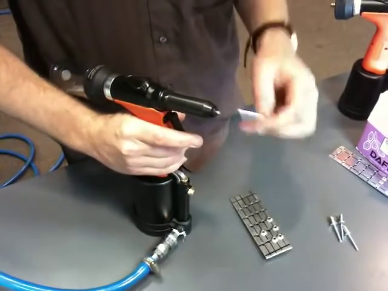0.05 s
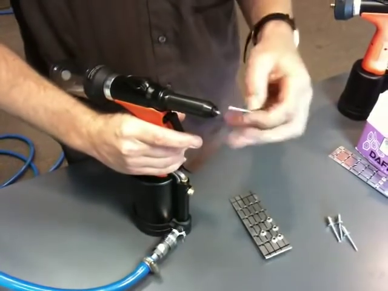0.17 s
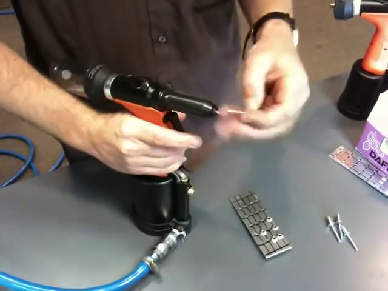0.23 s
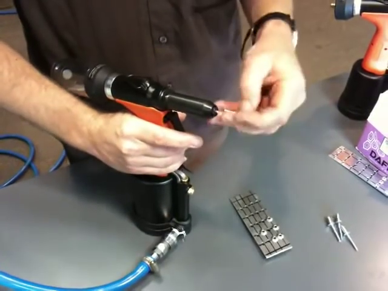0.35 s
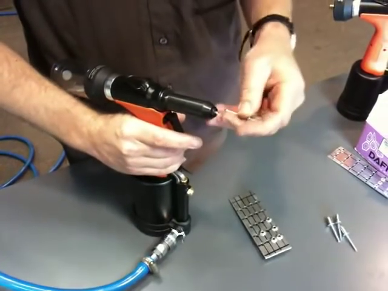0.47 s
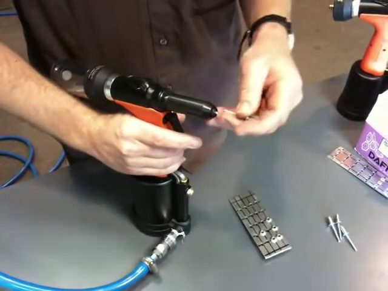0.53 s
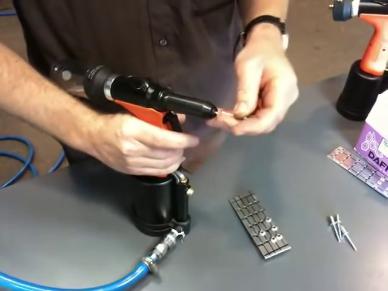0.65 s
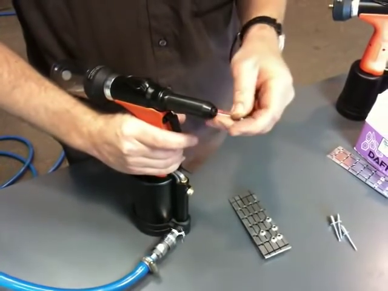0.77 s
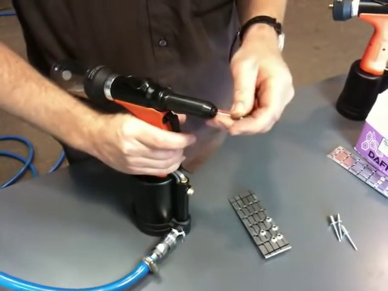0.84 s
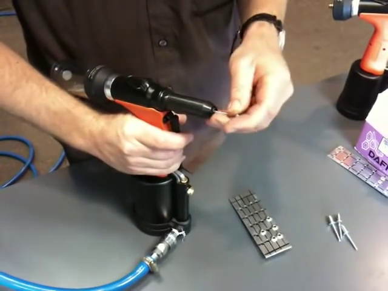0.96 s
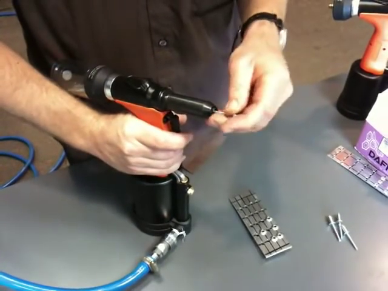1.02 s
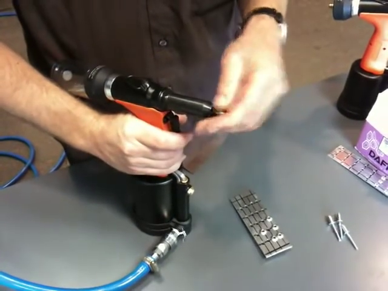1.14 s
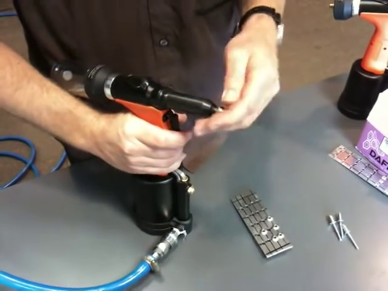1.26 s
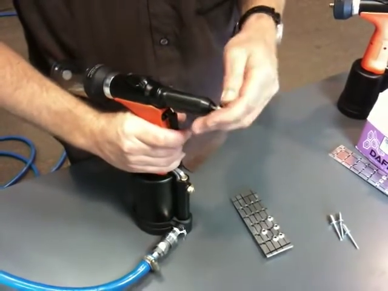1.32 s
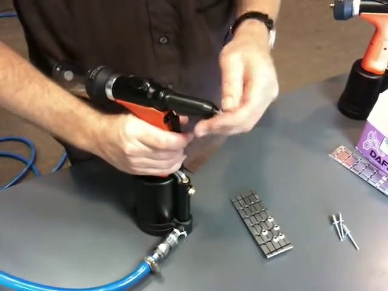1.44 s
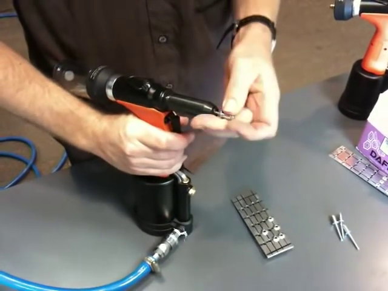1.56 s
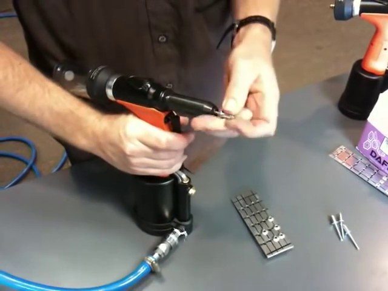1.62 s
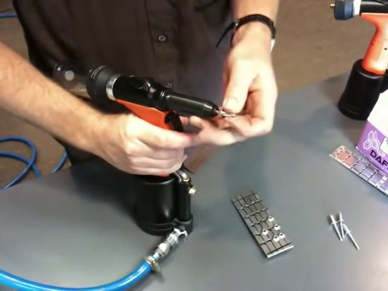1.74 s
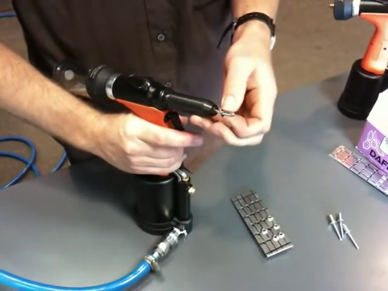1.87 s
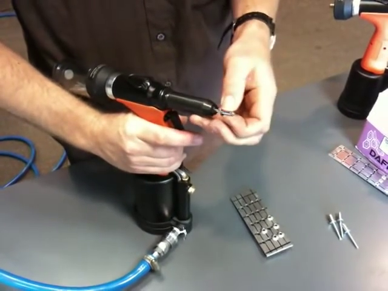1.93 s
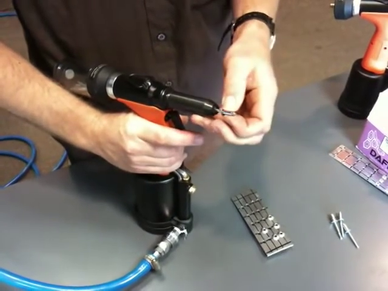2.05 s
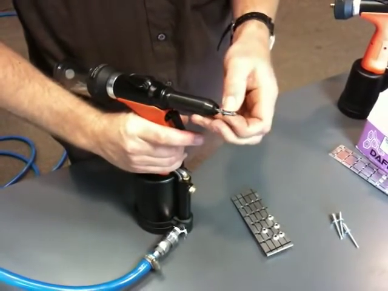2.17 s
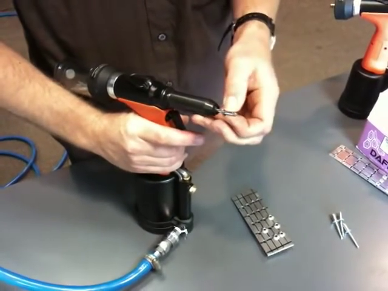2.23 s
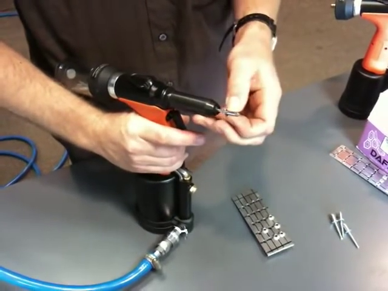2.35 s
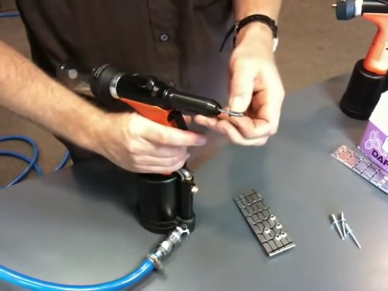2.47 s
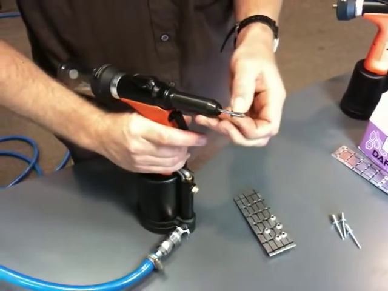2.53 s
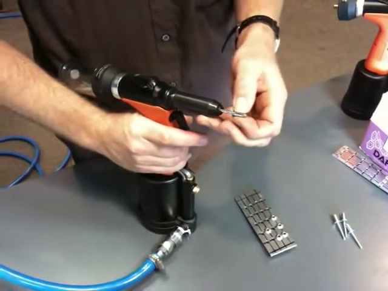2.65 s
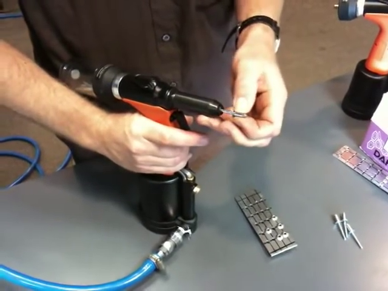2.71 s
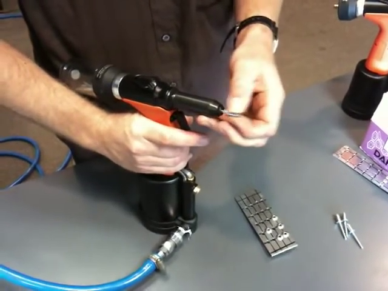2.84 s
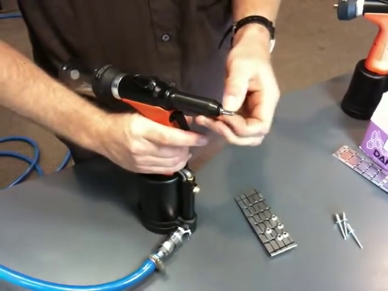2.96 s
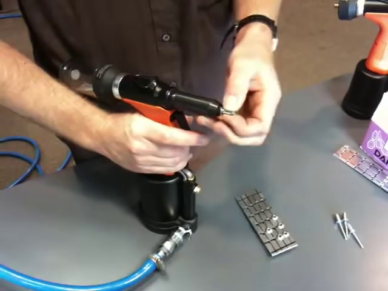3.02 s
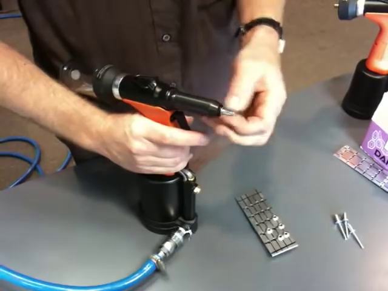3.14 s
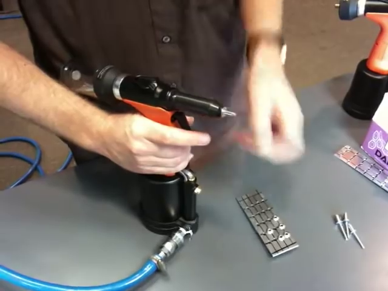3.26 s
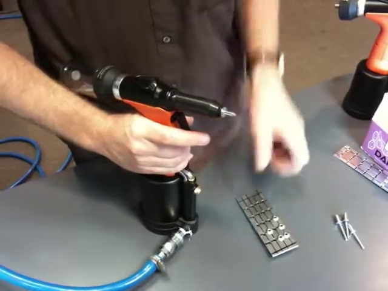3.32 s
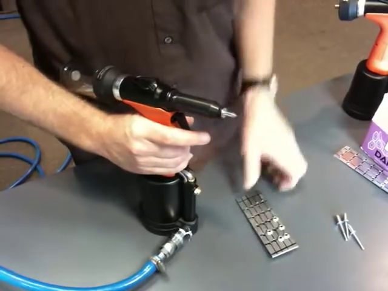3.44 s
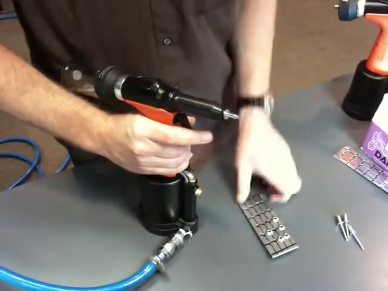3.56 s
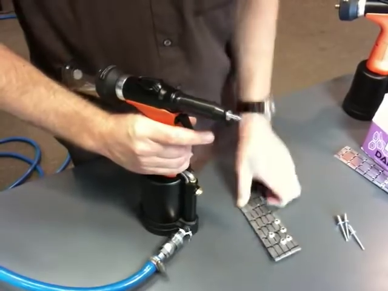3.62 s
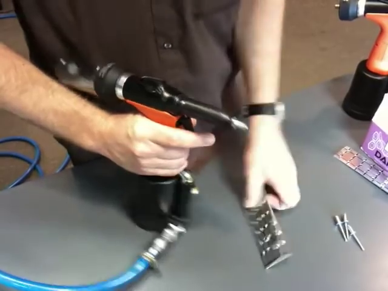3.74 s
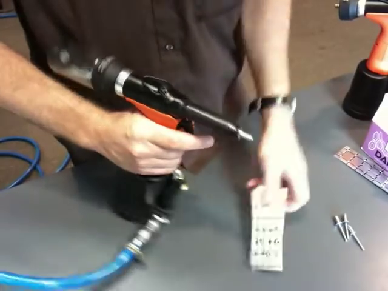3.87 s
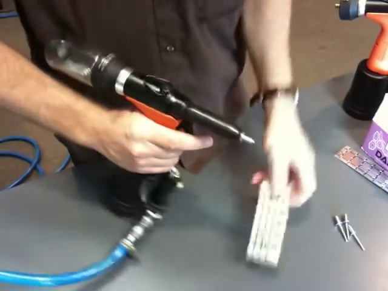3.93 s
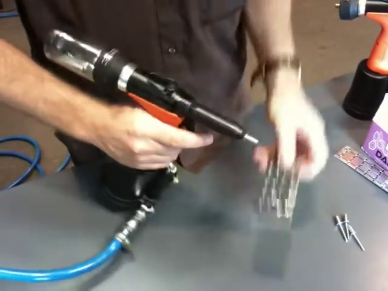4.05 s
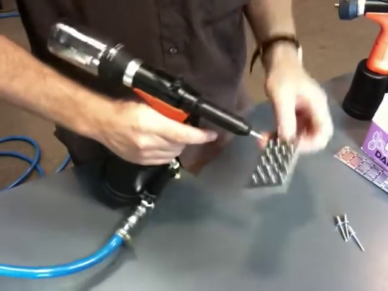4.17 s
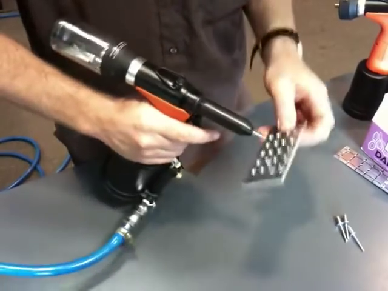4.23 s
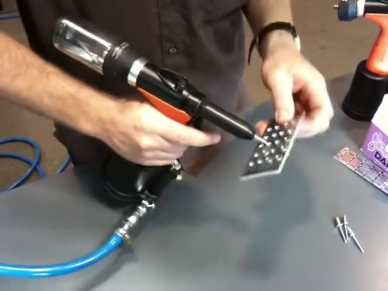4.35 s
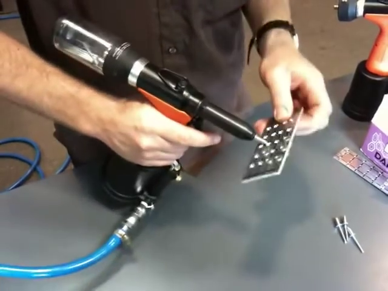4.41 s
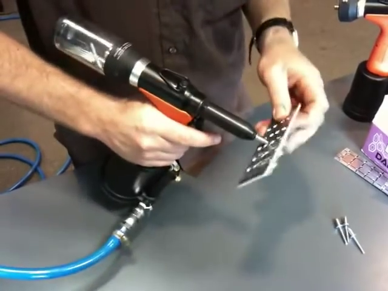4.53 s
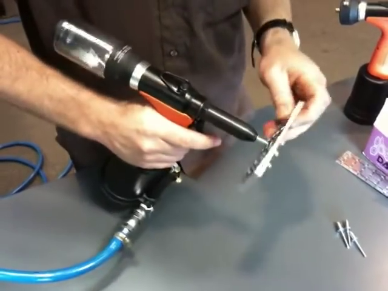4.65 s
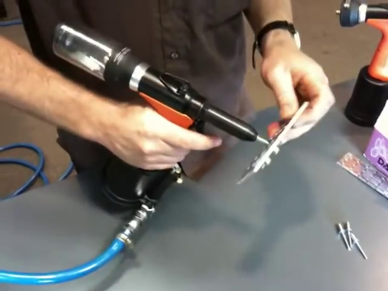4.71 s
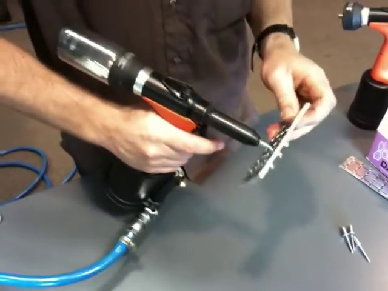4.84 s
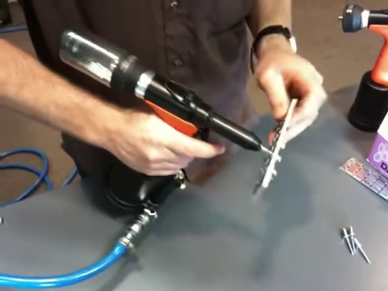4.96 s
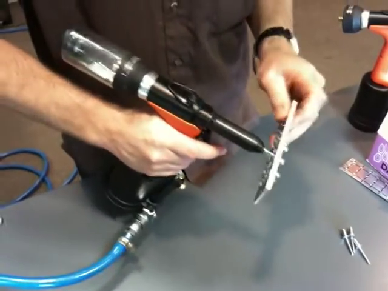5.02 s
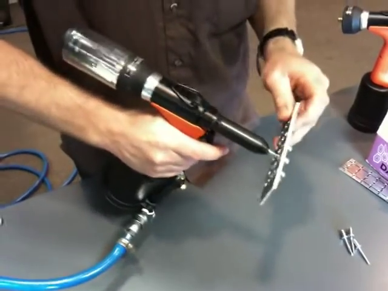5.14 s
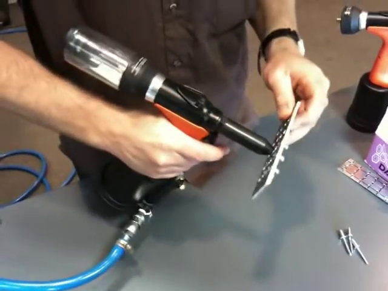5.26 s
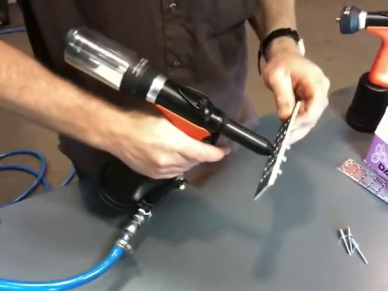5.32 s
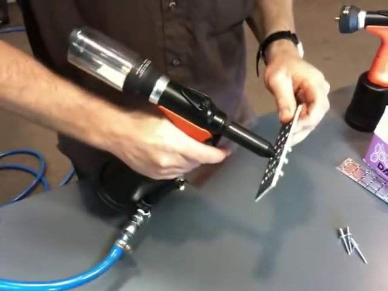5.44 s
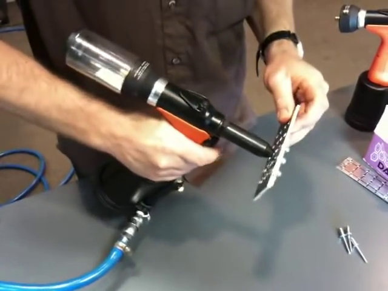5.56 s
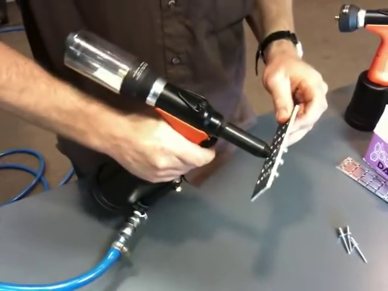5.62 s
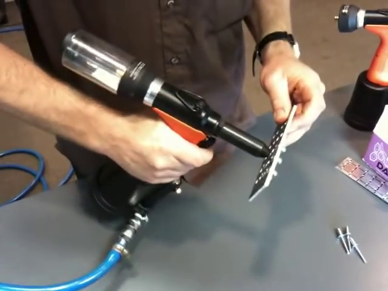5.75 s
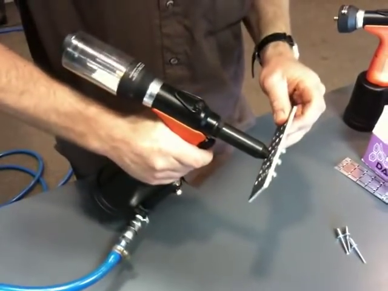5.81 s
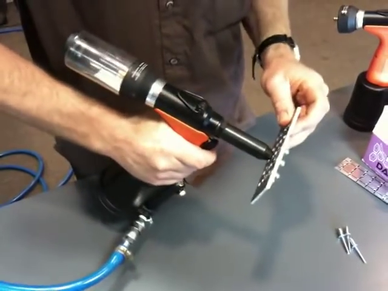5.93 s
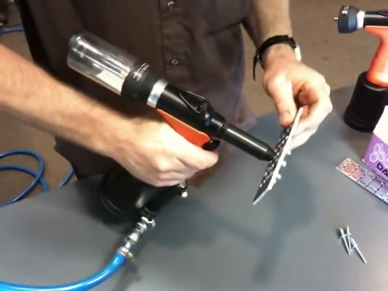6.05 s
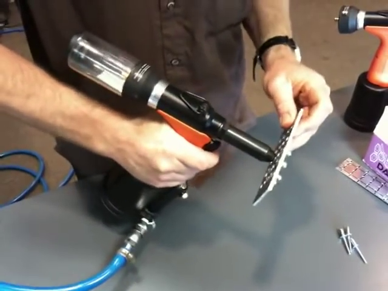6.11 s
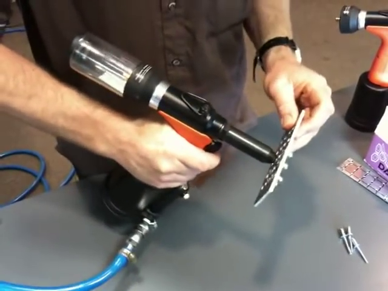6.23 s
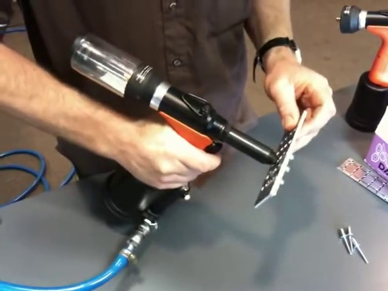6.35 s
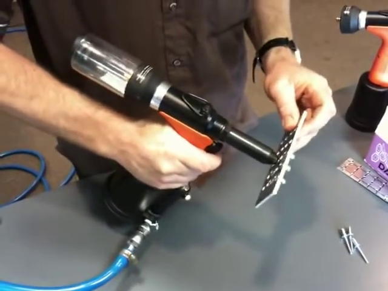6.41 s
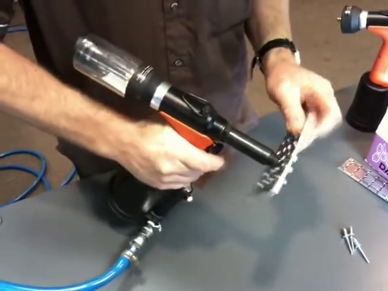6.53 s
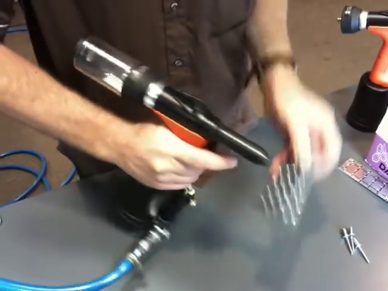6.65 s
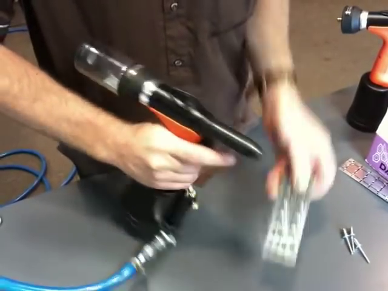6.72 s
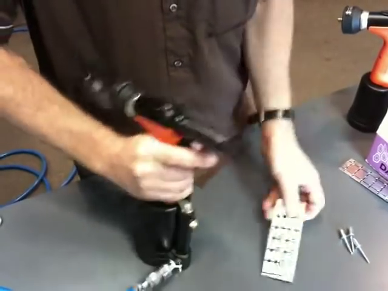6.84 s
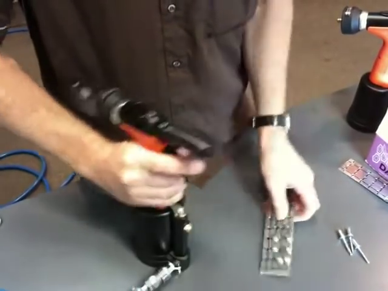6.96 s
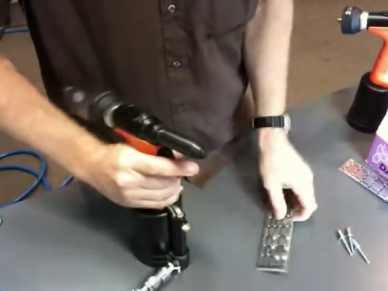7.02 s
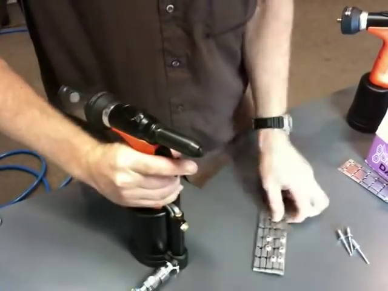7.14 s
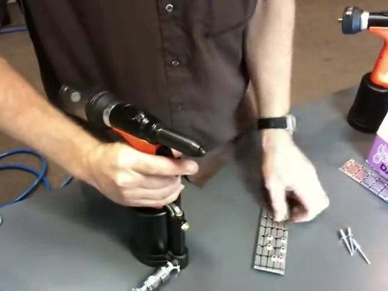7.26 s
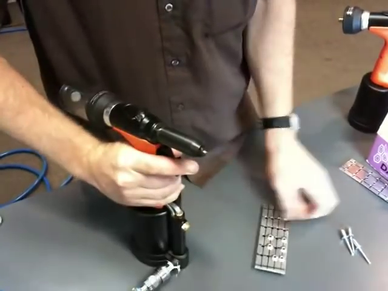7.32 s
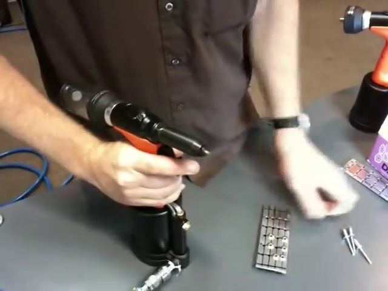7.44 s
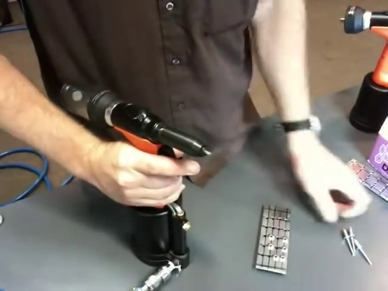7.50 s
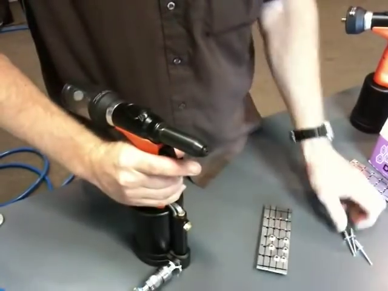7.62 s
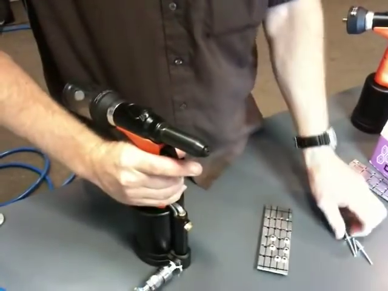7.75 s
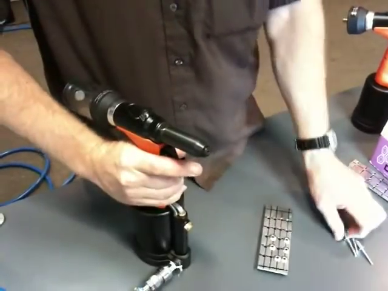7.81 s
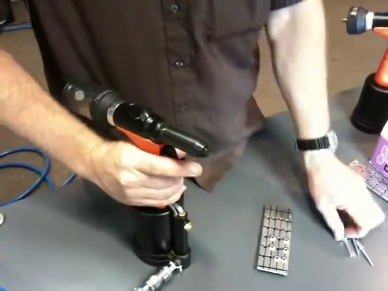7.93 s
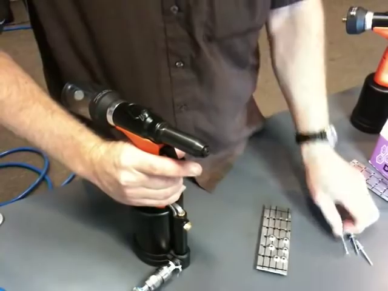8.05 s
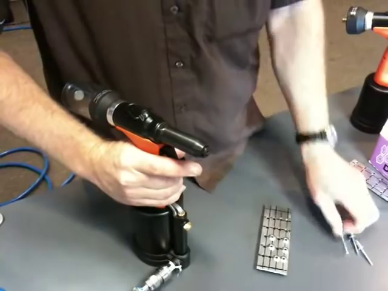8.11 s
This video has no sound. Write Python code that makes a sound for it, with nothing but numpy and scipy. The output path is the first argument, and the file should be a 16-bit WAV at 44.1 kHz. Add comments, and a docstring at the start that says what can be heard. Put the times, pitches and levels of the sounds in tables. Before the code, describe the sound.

Close airy hissing and faint whistles, a sharp valve knock, light metal taps, one cracking rivet snap, plate chatter on a bench, another knock.

```python
"""A pneumatic rivet gun on a workbench, heard close up while a machine hums in the workshop (summed shaft orders).
Suction air hisses and rings the barrel (filtered and resonant noise); the trigger valve knocks, with puffs of air.
Whistles glide through the nose as a rivet taps its way into a steel plate, and the bench drones under the gun.
The mandrel snaps off in three ringing bursts; the plate (decaying modes) is handled, laid down and chatters.
A last valve knock follows. Knocks, taps, snaps and plate contacts share a short diffuse echo."""
import sys
import numpy as np
from scipy import signal
from scipy.fft import rfft, irfft
from scipy.io import wavfile

SR = 44100
rng = np.random.default_rng(int(sys.argv[2]) if len(sys.argv) > 2 else 0)


def file_out(sig):
    """Save sig as 16-bit WAV at sys.argv[1]."""
    # one column per channel
    cols = np.atleast_2d(sig).T
    # limit, then scale
    lim = np.clip(cols, -1, 1)
    pcm = np.round(lim * 32767).astype(np.int16)
    wavfile.write(sys.argv[1], SR, pcm)


N = 360738
TIME = np.arange(N) / SR  # clock of the whole scene [s]
AGE = np.arange(SR // 2) / SR  # clock of one hit or puff, half a second long [s]

# Hum of a machine in the workshop: (multiple of the shaft rate, rms level [dB])
HUM_ORDERS = [(6, -67), (8, -54), (10, -54.5), (11, -55), (12, -75), (14, -56.5), (16, -62), (18, -57),
              (22, -60), (23, -68), (24, -61.5), (27, -64), (28, -42.5), (29, -64), (32, -59), (34, -86),
              (35, -61), (36, -57.5), (47, -61.5), (54, -51.5), (56, -61), (58, -72), (68, -58), (74, -76),
              (76, -66), (78, -54), (94, -65), (98, -63.5)]
SHAFT_HZ = 21.4336
# Spectrum of the workshop background: (frequency [Hz], relative density [dB per Hz])
SHOP_SPECTRUM = [(30, -26), (60, -18), (120, -15), (175, -3.5), (230, 3), (330, -3.5), (500, -4),
                 (610, -10.5), (850, -6.5), (1250, -6), (1700, -2), (2700, -13.5), (6000, -25.5),
                 (16000, -31)]

# Strength of the suction air, heard relative to idle: (time [s], level [dB])
FLOW = [(0.0, -46.5), (0.82, -46.5), (1.02, -39.5), (1.82, -39.5), (2.55, -45.5), (2.94, -46), (4.26, -48),
        (5.35, -45.5), (5.69, -45.5), (5.85, -42), (6.15, -41.5), (6.65, -41.5), (6.88, -43), (7.68, -45.5),
        (7.88, -41.5), (8.18, -39.5)]
IDLE_FLOW_DB = -47
# Spectrum of the air jet's hiss: (frequency [Hz], relative density [dB per Hz])
JET_SPECTRUM = [(300, -35), (1500, -7.5), (2900, -8.5), (3900, 2), (4500, -4), (6500, 1), (8000, 1.5),
                (9800, 2), (11300, 0), (12600, 1), (14200, -3), (15700, -3)]
JET_DB = -42  # hiss at idle flow; it follows the flow one to one
# Air column of the barrel: (frequency [Hz], width [Hz], relative level [dB])
BARREL_MODES = [(3780, 450, -11), (4990, 380, -1), (5970, 310, -5), (8600, 360, -3.5), (9160, 190, 0),
                (10200, 250, -6), (12800, 300, -13), (13500, 250, -10)]
BARREL_DB, BARREL_FOLLOW = -43.5, 0.69  # level at idle flow, and dB per dB of flow
NOZZLE_HZ, NOZZLE_WIDTH_HZ, NOZZLE_DB = 8960, 600, -5.5  # the nozzle's own tone, against the barrel
# Spells in which the barrel rings only weakly: (start [s], end [s], change of level [dB])
WEAK_SPELLS = [(3.707, 6.95, -7.5), (7.095, 8.6, -7)]
WEAK_RAMP_S = 0.41
STALL_DB, STALL_RECOVERY_S = -9, 0.3  # each valve knock stalls the barrel's ring, which then recovers

# Trigger valve knocks: (time [s], level [dB])
KNOCKS = [(0.863, -8), (7.7488, -8)]
# Air leaks just before each knock and vents just after it; levels against the knock
LEAK_LEAD_S, LEAK_RISE_S, LEAK_T60_S, LEAK_MUFFLER_DB, LEAK_HISS_DB = 0.075, 0.15, 0.55, -39, -14
VENT_DELAY_S, VENT_RISE_S, VENT_T60_S, VENT_MUFFLER_DB, VENT_HISS_DB = 0.013, 0.017, 1, -27, -30
# Other puffs: (time [s], rise constant [s], decay t60 [s], muffler level [dB], hiss level [dB])
PUFFS = [(1.84, .064, 0.64, -26, -23), (5.65, 0.017, 0.45, -44, -30), (6.643, 0.0051, 1, -32, -30.5)]
# Spectrum of air through the muffler: (frequency [Hz], relative density [dB per Hz])
MUFFLER_SPECTRUM = [(400, -10), (1200, -4), (2000, 3), (3000, -0.5), (4000, 0.5), (5000, -4), (7600, 7.5),
                    (10000, -25), (15000, -36)]
# Valve block and its hollow air chamber: (frequency [Hz], relative level [dB], decay t60 [s])
VALVE_MODES = [(571, -10, 0.061), (1840, -4.5, 0.013), (4300, -1, 0.0078), (5330, -10, 0.011),
               (5910, 4.5, 0.0044), (7870, 3, 0.008)]
# Spectrum of the valve's crack: (frequency [Hz], relative density [dB per Hz])
CRACK_SPECTRUM = [(300, -7), (900, -4.5), (1400, -1.5), (2900, -8), (4300, 4), (7600, -5.5), (10000, 1),
                  (13000, -11), (16000, -25)]
# The piston rebounds, then meets its stop: (delay [s], level against the knock [dB], decay t60 [s])
PISTON = [(.017, -20, 0.02), (0.0672, -20, 0.052)]
# Nose of the gun: (frequency [Hz], relative level [dB], decay t60 [s])
NOSE_MODES = [(627, -9, 0.11), (1540, 0.5, 0.022), (2420, -0.5, 0.0093), (5680, 0.5, 0.049)]
# Spectrum of a tap of metal on metal: (frequency [Hz], relative density [dB per Hz])
TAP_SPECTRUM = [(200, -24), (600, -1), (900, -5), (1300, 6.5), (1850, 5.5), (2450, 7.5), (3300, -2),
                (4400, 2), (5000, -9), (5850, 2), (7000, -6), (10600, 4), (12000, -19), (16000, -5.5)]

# Whistles of a partly blocked nose:
# (start [s], end [s], ramp [s], start pitch [Hz], end pitch [Hz], width [Hz], mid level [dB])
WHISTLES = [(1.015, 1.88, .035, 7160, 7210, 480, -36), (1.049, 2.7, .25, 9000, 8820, 650, -39.5),
            (2.724, 2.83, .025, 6470, 6350, 100, -36), (2.92, 3.92, 0.092, 10170, 10170, 260, -49.5),
            (3.752, 5.8, .4, 9260, 9120, 190, -42.5), (5.629, 6.715, .03, 7210, 7340, 478, -42.5),
            (5.833, 6.5, .08, 8670, 8540, 199.5, -40), (7.03, 7.29, .04, 9300, 11440, 795, -43),
            (7.8, 8.3, .08, 10000, 9880, 380, -48)]
WHISTLE_ENDS_DB = -1  # a whistle is strongest in the middle

# The rivet taps on metal: (time [s], level [dB], decay t60 [s])
RIVET_TAPS = [(1.227, -32, 0.038), (3.872, -36, 0.12), (4.8599, -19, .062), (4.891, -30.5, 0.07),
              (5.069, -27, 0.068), (5.3121, -13, 0.033)]
GRAZE_LEAD_S, GRAZE_DB, GRAZE_T60_S = 0.007, -11, 0.056  # it grazes the metal just before each tap
# The mandrel breaks, the jaws recoil, the stub hits the catcher: (time [s], level [dB], decay t60 [s])
SNAPS = [(6.4157, -0.5, 0.035), (6.4198, -6, 0.031), (6.4325, -7.5, 0.023)]
# Spectrum of the whole gun ringing: (frequency [Hz], relative density [dB per Hz])
GUN_SPECTRUM = [(150, -17), (430, -10), (600, -3.5), (1000, -6), (1750, 1.5), (2800, -3), (4400, -3.5),
                (5300, 6.5), (6500, -2), (8000, 4.5), (10200, 5), (11500, -7.5), (16000, -6)]

# Dull knocks of gun and hand on the bench: (time [s], peak level [dB], frequency [Hz])
BUMPS = [(1.261, -34, 264), (1.31, -36, 320), (6.923, -26.5, 806), (6.972, -30.5, 150), (7.266, -29, 322),
         (7.30, -32, 308), (7.399, -34, 315)]
# The base of the gun drags on the bench: (start [s], end [s], frequency [Hz], width [Hz], level [dB])
DRAG = (2, 3, 315.5, 29.5, -50.5)
# The plate meets bench and gun: (time [s], thud level [dB], ring level [dB],
# hardness [dB per octave], share of ring time that the hand allows [ratio], way of moving driven)
CONTACTS = [(3.836, -28.5, -30, -12, 0.24, "bending"), (3.9837, -28, -20, -4, 0.55, "edgewise"),
            (4.461, -44, -34.5, 3, .6, "twisting"), (6.9222, -23, -29.5, 2, .7, "edgewise"),
            (7.232, -35, -35, -6, .95, "bending"), (7.35, -32.5, -36, -4, 1, "bending"),
            (7.3979, -26, -29, 2.5, 1, "twisting")]
# The plate chatters as it settles: (start [s], end [s], thud level [dB], ring level [dB])
CHATTERS = [(7.2652, 7.318, -29, -41.5), (7.417, 7.468, -33, -50)]
CHATTER_GAP_S, CHATTER_JITTER_S, CHATTER_HARDNESS_DB = 0.0115, 0.0018, 9  # hardness per octave
# Free steel plate: (frequency [Hz], relative level [dB], undamped t60 [s], way of moving)
PLATE_MODES = [(2835, 0.5, 0.11, "bending"), (5960, 2, 0.17, "bending"), (5425, 3, 0.075, "twisting"),
               (8300, -4, 0.11, "twisting"), (10260, -6, 0.1, "twisting"), (13450, 0, .07, "twisting"),
               (3593, -1.5, 0.11, "edgewise")]
OTHER_WAYS_DB = -9  # a contact drives one way of moving; the others stay this far below
# Spectrum of a thud into the bench: (frequency [Hz], relative density [dB per Hz])
THUD_SPECTRUM = [(80, -26), (200, -25), (320, 10), (480, -1.5), (850, -0.5), (1300, 0), (1750, 4),
                 (2400, -8.5), (5000, -9.5), (16000, -18.5)]
CLICK_DB, CLICK_T60_S = 1, 0.028  # click of a plate contact, level against its ring

# Spectrum of the workshop's echo: (frequency [Hz], relative density [dB per Hz])
ECHO_SPECTRUM = [(100, 1.5), (2000, -2.5), (6000, -3.5), (16000, -23.0)]
BAND_EDGE_HZ = 15950


def amp(db):
    """Decibels to gain."""
    return 10 ** (np.asarray(db) / 20)


def unit(x):
    """Scales to rms 1."""
    return x / np.sqrt(np.mean(x ** 2) + 1e-20)


def curve(rows):
    """Joins (time, value) rows by straight lines."""
    return np.interp(TIME, *np.transpose(rows))


def gate(start, end, ramp_s):
    """Rises from 0 to 1 at start and is back at 0 by end."""
    return np.clip(np.minimum(TIME - start, end - TIME) / ramp_s, 0, 1)


def add(mix, s, sound):
    """Mixes a sound in at s seconds."""
    part = mix[max(round(s * SR), 0):][:len(sound)]
    part += sound[:len(part)]


def noise(spectrum, size):
    """Noise of rms 1 with the given spectrum, read along log frequency."""
    hz, db = np.transpose(spectrum)
    bins_hz = np.fft.rfftfreq(size, 1 / SR)
    gain = amp(np.interp(np.log(bins_hz + 1), np.log(hz), db))
    return unit(irfft(rfft(rng.standard_normal(size)) * gain, size))


def blown(hz, width_hz):
    """Turbulence in a resonance whose pitch and width may move; rms 1."""
    steps = 8  # random steps per second for each Hz of width
    smooth = [1, -np.exp(-np.pi / 5)]
    wander = signal.lfilter([1], np.convolve(smooth, smooth), rng.standard_normal((2, N)), axis=1)
    # the wider the resonance, the faster its amplitude and phase wander
    place = steps * np.cumsum(width_hz * np.ones(N)) / SR
    in_phase, quadrature = (np.interp(place, np.arange(N), part) for part in wander)
    phase = 2 * np.pi * np.cumsum(hz * np.ones(N)) / SR
    return unit(in_phase * np.cos(phase) + quadrature * np.sin(phase))


def fade(t60):
    """Exponential decay, 60 dB down after t60 seconds."""
    return np.exp(-np.log(1000) * AGE / t60)


def burst(spectrum, t60):
    """Dense ringing of a struck part, starting at about rms 1."""
    envelope = fade(t60)
    return unit(noise(spectrum, len(AGE)) * envelope) * np.sqrt(np.mean(envelope ** 2))


def ring(hz, t60):
    """One dying mode."""
    return np.sin(2 * np.pi * hz * AGE) * fade(t60)


def struck(modes):
    """A few modes of a struck part ring together, with alternating sign."""
    return sum((-1) ** k * amp(db) * ring(hz, t60) for k, (hz, db, t60) in enumerate(modes))


def workshop(shop_db=-44.0, waver=0.085, scatter_turns=0.64):
    """A machine's shaft orders, loosely in step and each wavering a little, over the background."""
    hum = np.zeros(N)
    knots = np.linspace(0, TIME[-1], num=40)
    for order, db in HUM_ORDERS:
        sway = 1 + waver * np.interp(TIME, knots, rng.standard_normal(len(knots)))
        turns = order * SHAFT_HZ * TIME + scatter_turns * rng.random()
        hum += np.sqrt(2) * amp(db) * sway * np.sin(2 * np.pi * turns)
    return hum + amp(shop_db) * noise(SHOP_SPECTRUM, N)


def air():
    """The suction jet hisses and blows the barrel's air column and the nozzle; all follow the flow."""
    flow_db = curve(FLOW) - IDLE_FLOW_DB
    hiss = amp(JET_DB + flow_db) * noise(JET_SPECTRUM, N)
    barrel_db = BARREL_DB + BARREL_FOLLOW * flow_db
    for start, end, db in WEAK_SPELLS:
        barrel_db += db * gate(start, end, WEAK_RAMP_S)
    for s, _ in KNOCKS:
        barrel_db += STALL_DB * (TIME > s) * np.exp(-abs(TIME - s) / STALL_RECOVERY_S)
    # the root of the width gives each resonance the power of equally dense noise
    column = unit(sum(amp(db) * np.sqrt(width) * blown(hz, width) for hz, width, db in BARREL_MODES))
    nozzle = amp(NOZZLE_DB) * blown(NOZZLE_HZ, NOZZLE_WIDTH_HZ)
    return hiss + amp(barrel_db) * (column + nozzle)


def exhaust():
    """Spent air leaves the muffler in soft, hissing puffs; air leaks before every knock and vents after it."""
    out = np.zeros(N)
    puffs = list(PUFFS)
    for s, db in KNOCKS:
        puffs.append((s - LEAK_LEAD_S, LEAK_RISE_S, LEAK_T60_S, db + LEAK_MUFFLER_DB, db + LEAK_HISS_DB))
        puffs.append((s + VENT_DELAY_S, VENT_RISE_S, VENT_T60_S, db + VENT_MUFFLER_DB, db + VENT_HISS_DB))
    for s, rise_s, t60, muffler_db, hiss_db in puffs:
        muffled = amp(muffler_db) * noise(MUFFLER_SPECTRUM, len(AGE))
        hiss = amp(hiss_db) * noise(JET_SPECTRUM, len(AGE))
        add(out, s, (muffled + hiss) * (1 - np.exp(-AGE / rise_s)) * fade(t60))
    return out


def valve(crack_t60=0.02):
    """The valve slams: a crack, short metal modes and a hollow pop of the air chamber; then the piston taps."""
    out = np.zeros(N)
    block = struck(VALVE_MODES)
    for s, db in KNOCKS:
        add(out, s, amp(db) * (block + burst(CRACK_SPECTRUM, crack_t60)))
        for delay, piston_db, t60 in PISTON:
            add(out, s + delay, amp(db + piston_db) * tap(t60))
    return out


def tap(t60, nose_db=-9):
    """Metal touches metal and rings the nose."""
    return burst(TAP_SPECTRUM, t60) + amp(nose_db) * struck(NOSE_MODES)


def whistles():
    """Air squeezing past the rivet whistles; each whistle swells a little and glides."""
    out = np.zeros(N)
    for start, end, ramp_s, start_hz, end_hz, width, db in WHISTLES:
        off_middle = np.interp(TIME, [start, end], [-1, 1])
        level = amp(db + WHISTLE_ENDS_DB * off_middle ** 2) * gate(start, end, ramp_s)
        pitch_hz = np.interp(TIME, [start, end], [start_hz, end_hz])
        out += level * blown(pitch_hz, width)
    return out


def rivet(tail_db=-20, tail_t60=0.44, sleeve_db=-25, sleeve_hz=5370, sleeve_width_hz=350, sleeve_t60=0.31):
    """Taps ring the nose while the rivet finds its hole; the snap sets the whole gun and its sleeve ringing."""
    out = np.zeros(N)
    for s, db, t60 in RIVET_TAPS:
        add(out, s - GRAZE_LEAD_S, amp(db + GRAZE_DB) * tap(GRAZE_T60_S))
        add(out, s, amp(db) * tap(t60))
    for s, db, t60 in SNAPS:
        sleeve = amp(sleeve_db) * blown(sleeve_hz, sleeve_width_hz)[:len(AGE)] * fade(sleeve_t60)
        tail = amp(tail_db) * burst(GUN_SPECTRUM, tail_t60)
        add(out, s, amp(db) * (burst(GUN_SPECTRUM, t60) + tail + sleeve))
    return out


def plate(bump_t60=0.1, chatter_ring_share=0.78):
    """Dull bumps on the bench, the plate's single contacts and its quick uneven chatter."""
    out = np.zeros(N)
    for s, db, hz in BUMPS:
        add(out, s, amp(db) * ring(hz, bump_t60))
    for s, *blow in CONTACTS:
        add(out, s, contact(*blow))
    for start, end, thud_db, ring_db in CHATTERS:
        for s in np.arange(start, end, CHATTER_GAP_S):
            jitter = CHATTER_JITTER_S * rng.uniform(-1, 1)
            blow = contact(thud_db, ring_db, CHATTER_HARDNESS_DB, chatter_ring_share, "bending")
            add(out, s + jitter, blow)
    return out


def drag():
    """Friction under the gun makes the bench top drone for a moment."""
    start, end, hz, width, db = DRAG
    swell = np.sin(np.pi * np.clip((TIME - start) / (end - start), 0, 1))
    return amp(db) * blown(hz, width) * swell


def contact(thud_db, ring_db, hardness_db, ring_share, driven, thud_t60=0.1, pivot_hz=4500):
    """One contact clicks, thuds into the bench and rings the plate; hard contacts favour high modes."""
    thud = amp(thud_db) * burst(THUD_SPECTRUM, thud_t60)
    click = amp(ring_db + CLICK_DB) * burst(TAP_SPECTRUM, CLICK_T60_S)
    out = thud + click
    for hz, db, t60, way in PLATE_MODES:
        drive_db = ring_db + hardness_db * np.log2(hz / pivot_hz) + OTHER_WAYS_DB * (way != driven)
        out += rng.choice([-1, 1]) * amp(db + drive_db) * ring(hz, t60 * ring_share)
    return out


def room(x, wet_db=-14, t60=0.54, build_s=0.0021):
    """The workshop's short diffuse echo: decaying noise that builds up quickly."""
    tail = noise(ECHO_SPECTRUM, len(AGE)) * fade(t60) * (1 - np.exp(-AGE / build_s))
    echo = signal.fftconvolve(x, tail / np.linalg.norm(tail))[:N]
    return x + amp(wet_db) * echo


def scene():
    """Hum, air and hits, the same in both channels; only the hits get the echo."""
    hits = room(valve() + rivet() + plate())
    mono = workshop() + air() + exhaust() + whistles() + drag() + hits
    return np.array([mono, mono])


def record(dry, ceiling=0.73, bias=0.13, low_cut_hz=100):
    """The loudest cracks overload the microphone, a little lopsidedly; it has little bass; then the band limit."""
    squashed = ceiling * (np.tanh(dry / ceiling + bias) - np.tanh(bias))
    thin = signal.sosfilt(signal.butter(2, low_cut_hz, "highpass", fs=SR, output="sos"), squashed)
    band_limit = signal.firwin(511, BAND_EDGE_HZ, window=("kaiser", 9), fs=SR)
    return signal.oaconvolve(thin, band_limit[None], "same")


dry = scene()
out = record(dry)
file_out(out)
```